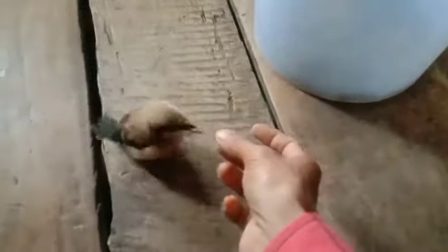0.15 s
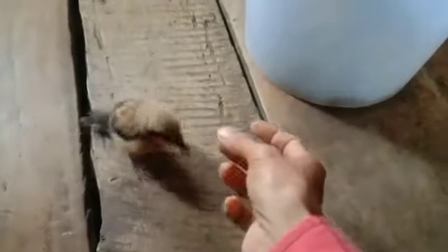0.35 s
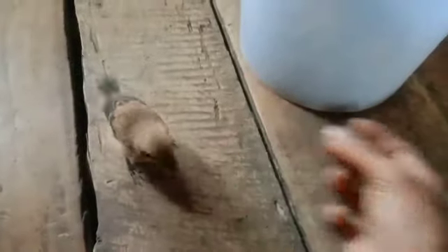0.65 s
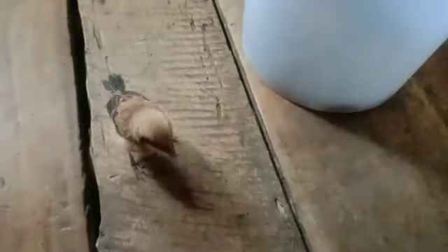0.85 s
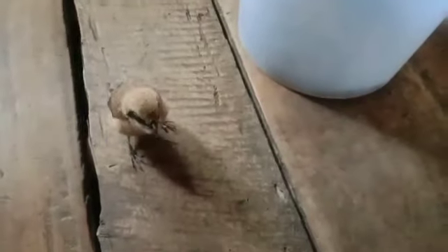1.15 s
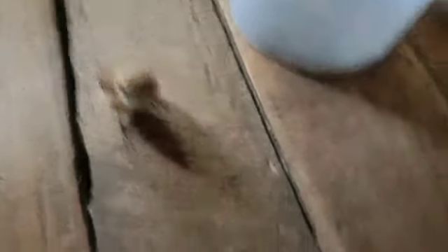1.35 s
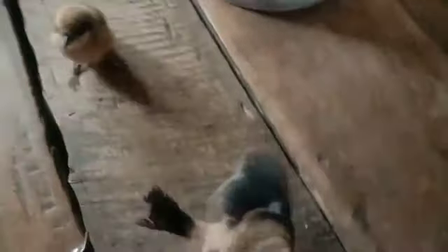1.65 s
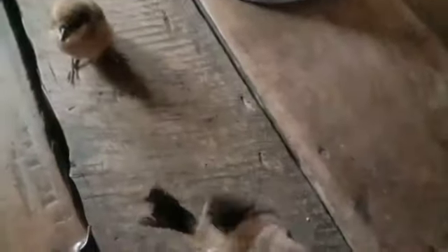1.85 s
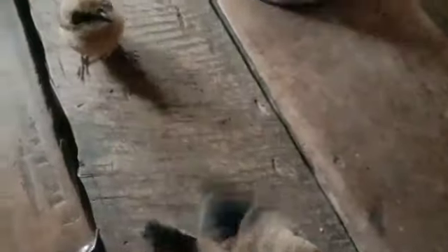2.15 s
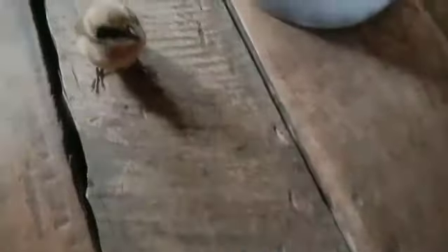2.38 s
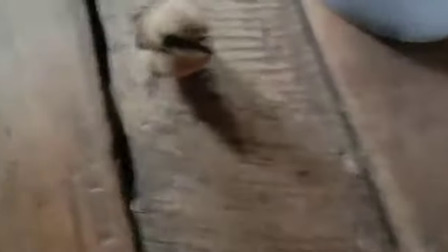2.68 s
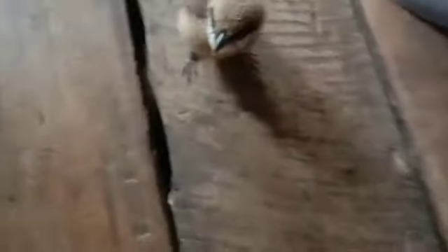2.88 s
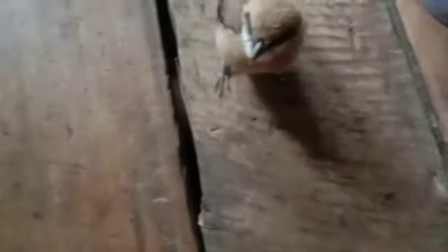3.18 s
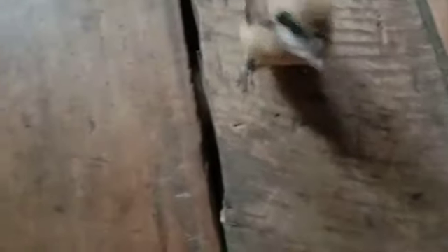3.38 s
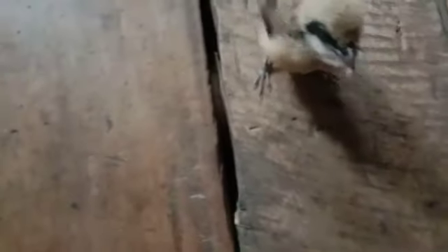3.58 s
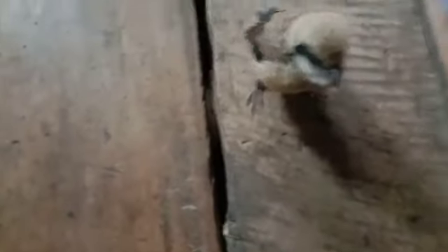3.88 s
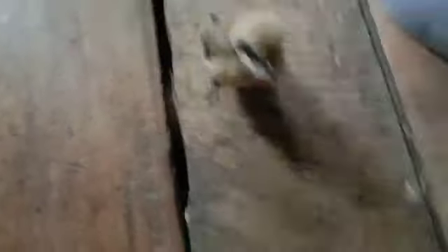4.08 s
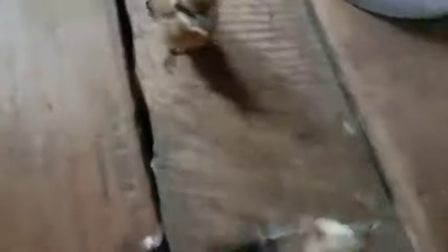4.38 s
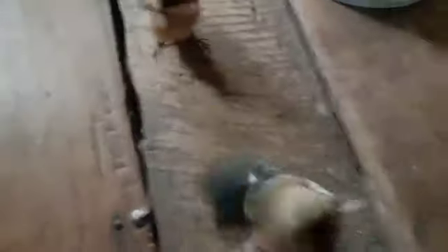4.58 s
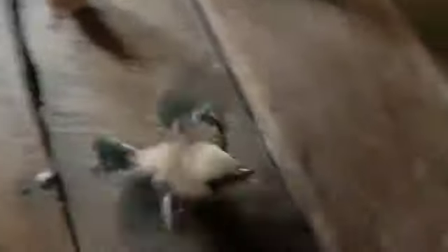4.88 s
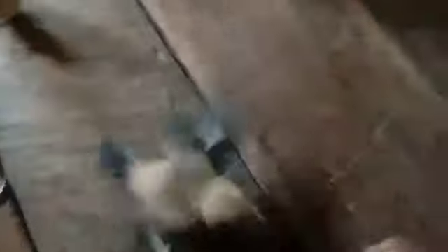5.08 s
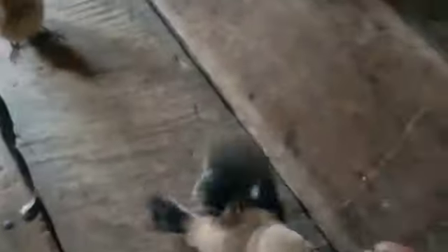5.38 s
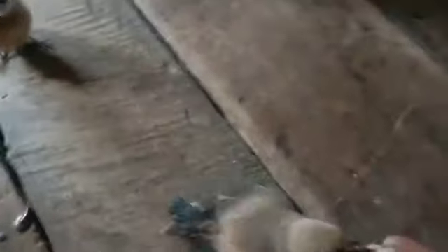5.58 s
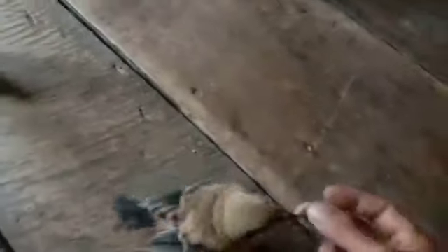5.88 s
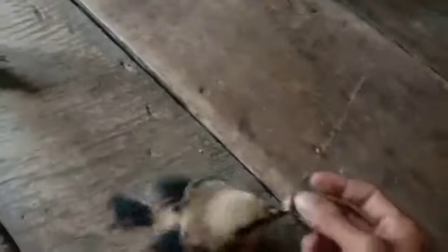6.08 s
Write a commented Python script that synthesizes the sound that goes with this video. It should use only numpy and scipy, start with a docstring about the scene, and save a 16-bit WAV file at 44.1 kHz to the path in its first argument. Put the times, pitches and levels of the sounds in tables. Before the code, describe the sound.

Two young birds beg very close to the microphone in a small wooden room with a short tail. At 0 s both are already mid-call; the lower voice then gives short, rough, nasal squawks around 0.35, 0.75, 0.9, 1.3 and 2 s, some tripping into harsh catches, most slurring downward. The higher voice adds a brief soft call near 0.9 s and raspy buzzes at 2.25 and 2.7 s. From 3.2 s both call almost continuously, overlapping, longer and more forceful, each squawk swelling; the last low one runs from 6.15 s to the end. Light woody taps dot the boards from 1.6 s, clearest near 3.9 and 5.3 s, with faint grainy scuffs at 2.5, 4.6, 5.3 and 5.8 s. Outside, a muffled slow engine rumbles, eases off around 1.5 to 2.5 s, then accelerates and approaches, its low thuds loudest at the end. Quiet air noise lies beneath.

```python
"""Rasping, overlapping squawks of two young shrikes begging close by on a plank floor; most end in a falling slur.
Each voice is a bright harmonic tone that a fast, uneven flutter of the syrinx roughens, with hissing air in it.
Outside, muffled by the walls, a slow single-cylinder engine eases off, then speeds up and comes nearer:
a thud a firing over a diffuse rumble. Small knocks ring the boards, grainy scuffs brush them, and air noise
lies beneath. The near sounds carry the short tail of a small wooden room."""
import sys
import numpy as np
from scipy import signal
from scipy.fft import rfft, irfft
from scipy.io import wavfile

SR = 44100
rng = np.random.default_rng(int(sys.argv[2]) if len(sys.argv) > 2 else 0)


def output_pcm(signal):
    """Save a mono or channel-first signal as 16-bit PCM at the path in sys.argv[1].

    Samples are clipped to [-1, 1] before scaling.
    """
    pcm = np.clip(np.atleast_2d(signal).T, -1, 1) * 32767
    wavfile.write(sys.argv[1], SR, np.round(pcm).astype(np.int16))


N = 275184
TIME = np.arange(N) / SR

# Squawks of the lower voice: scoop, held pitch, break into a second register, slur.
# (start [s], break [s], end [s], scoop time constant [s], held pitch [Hz], pitch after the break [Hz],
#  sag [Hz/s], last pitch [Hz], swell from the onset, negative dies away [dB], overtones before the break [dB],
#  overtones after [dB], fundamental against its usual share [dB], rasp before [0-1], rasp after [0-1],
#  tilt from the gape of the beak [dB/octave], mean warble rate [1/s])
SQUAWKS = [ (-.2, 0.196, .264, 0.025, 2126, 1957, 300, 1100, -19, -21.5, -20.5, 1.5, 0.43, 0.49, -6, 50),
           (0.349, 0.497, .667, 0.021, 2438, 2512, 995, 1120, 8.5, -23.5, -26, -1.5, 0.1, 0.56, -18, 40),
           (0.752, 0.814, .89, .011, 2362, 2360, 100, 2590, -14, -38.5, -43.5, 3, 0.32, 0.24, -20, 40),
           (0.888, 1.126, 1.172, .022, 1729, 1672, 402, 1380, 15.5, -22.5, -22.5, 1, .76, 0.98, 3.5, 40),
           (1.268, 1.66, 1.88, 0.025, 2087, 2153, 863, 1417, 10.5, -21, -20.5, -10, 0.7, 0.26, 8, 30),
           (1.974, 2.257, 2.383, 0.018, 2400, 2275, 610, 1266, 4.5, -26, -18.5, -5, 0.14, 0.16, 16, 30),
           (3.268, 3.504, 3.62, .023, 1862, 1895, 200, 1320, 24, -12, -19.5, -1.5, 0.5, 0.11, 6.5, 28),
           (3.715, 3.868, 4.135, 0.032, 1926, 2008, 393, 1130, 27, -12, -14, -1, 0.42, .4, 8, 28),
           (4.325, 4.677, 4.786, .023, 2072, 2228, 299, 1050, 31, -13.5, -17.5, -5.5, .6, 0.3, 9, 55),
           (4.862, 5.094, 5.436, 0.022, 2042, 2284, 891, 1130, 18.5, -18.5, -17.5, -3.5, 0.64, 0.43, 7, 50),
           (5.506, 5.715, 6.074, 0.019, 1974, 2251, 380, 1200, 23, -12, -18.5, -0.5, 0.5, 0.34, 2.5, 75),
           (6.157, 6.183, 6.6, 0.008, 2330, 2270, 617, 1220, 10.5, -26, -21, 2, 0.12, 0.29, 1, 75), ]
# Catches, where a squawk trips into a short, harsh burst: (time [s], length [s], overtone gain [dB])
CATCHES = [(0.39, 0.074, -2), (0.546, .014, 5), (1.709, 0.011, 5.5), (1.734, 0.011, 6), (1.78, .038, 3),
           (1.824, 0.013, 4.5), (2.018, 0.029, -1.5), (2.084, .034, 5), (2.154, 0.016, 6.5),
           (2.22, .025, 9), (2.327, 0.01, 1.5), (2.352, 0.018, 2.5), (5.217, 0.013, 4.5),
           (5.238, 0.012, -1.5), (5.257, 0.015, 4.5), (5.342, .035, 4)]
# The squawk's usual fundamental against its overtones, by pitch: (pitch [Hz], level [dB])
FUNDAMENTAL = [(1100, 8.5), (1280, -16), (1550, -25), (1750, -15.5), (1950, -17), (2250, -4), (2600, -6.5),
               (3000, 3.5), (3500, 12.5)]
# Buzzes of the higher voice: a soft whistle, a break into a sagging rasp, a short slur.
# (start [s], break [s], end [s], whistle's first, middle and final pitch [Hz, Hz, Hz], buzz pitch [Hz],
#  sag [Hz/s], last pitch [Hz], whistle level [dB], buzz fundamental at the break [dB],
#  buzz overtones at the break [dB], rasp [0-1], closing rasp [0-1])
BUZZES = [ (-.1, -.02, .26, 2900, 2900, 2900, 2876, 408, 1962, -22, -18, -18.5, 0.38, .9),
          (0.885, 0.94, 1.01, 3344, 2850, 2353, 2320, 100, 2160, -14.5, -26, -29, 0.2, 0.67),
          (2.24, 2.405, 2.56, 2827, 3260, 2885, 2617, 1276, 1073, -28, -18.5, -14.5, 0.6, 0.4),
          (2.68, 2.735, 2.898, 3320, 3040, 2950, 2855, 3625, 1538, -20, -18.5, -15.5, 0.62, 0.1),
          (3.163, 3.317, 3.687, 2760, 2940, 2880, 2524, 456, 1393, -32.5, -15.5, -15.5, .38, 0.14),
          (3.804, 3.875, 4.177, 2710, 2932, 2770, 2462, 493, 1588, -27, -23, -19, .5, .05),
          (4.293, 4.343, 4.665, 3150, 2950, 2700, 2518, 496, 1720, -25, -24.5, -19.5, 0.55, .9),
          (4.775, 4.864, 5.135, 3000, 2707, 2600, 2620, 1014, 1610, -20.5, -26.5, -20, 0.67, 0.45), ]
# What throat and beak do to the overtones of each voice: (frequency [Hz], gain [dB])
LOW_THROAT = [(2300, -9.5), (3100, -3.5), (4000, -0.5), (5000, 0.5), (6000, 0), (7000, -3), (7700, -27.5),
              (8400, -18), (10500, -19.5), (13300, -35.5), (15200, -23)]
HIGH_THROAT = [(3100, -5), (4000, -13.5), (5000, -2.5), (6000, -6.5), (7400, -14.5), (8400, -33),
               (10300, -30.5), (13300, -68.5), (15200, -26.5)]
# Engine speed: (time [s], firing rate [1/s])
FIRING = [(0.0, 18.5), (0.92, 18.5), (1.16, 17.7), (1.53, 15.3), (1.75, 14.6), (2.48, 14.6), (3.09, 15.2),
          (4.03, 19.2), (6.24, 24.1)]
# Engine loudness as heard indoors: (time [s], level [dB])
ENGINE_LEVEL = [(0, -62), (.4, -43.5), (1.1, -39.5), (1.3, -50), (2, -45), (3.081, -40.5), (3.2, -30),
                (3.55, -35), (4.05, -31.5), (4.6, -27.5), (5.3, -23.5), (5.6, -28), (5.9, -23.5),
                (6.24, -19.5)]
# Exhaust thuds, then diffuse rumble, as they come through the walls: (frequency [Hz], relative level [dB])
EXHAUST = [(35, -29.5), (60, -28), (100, -12), (148, 8.5), (200, -4), (280, -1.5), (340, -20), (450, -28.5),
           (800, -49.5), (4000, -87.5)]
RUMBLE = [(35, -38.5), (60, -21.5), (90, -2.5), (140, 5), (200, -5.5), (260, -6), (320, -18), (450, -31.5),
          (800, -45), (4000, -92)]
# Spectrum of the air noise: (frequency [Hz], relative level [dB])
AIR = [(20, -18.5), (200, 28), (550, -6), (1050, -0.5), (1270, 11), (1500, -7.5), (7000, -4), (9000, -30.5)]
# Taps on the boards: (time [s], relative level [dB])
KNOCKS = [(1.642, -31), (2.727, -27.5), (3.409, -32), (3.543, -25.5), (3.874, -16), (4.205, -22.5),
          (4.49, -26.5), (4.642, -43), (5.316, -18.5)]
# Ringing modes of the planks: (nominal frequency [Hz], relative level [dB], 60 dB decay time [s])
PLANK_MODES = [(300, -2.5, 0.2), (530, -24, 0.05), (734, -13, 0.038), (982, -7.5, .04), (1246, -2.5, 0.058),
               (1930, 3.5, 0.0091)]
# Scuffs on the boards: (start [s], length [s], level at mid-stroke [dB])
SCUFFS = [(2.527, 0.27, -46), (4.617, 0.087, -34.5), (5.285, 0.1, -35), (5.759, 0.57, -42)]
# Spectrum of the scuffs: (frequency [Hz], relative level [dB])
SCUFF_COLOUR = [(100, -16), (350, 3), (700, -2.5), (900, -10.5), (1300, -5.5), (3000, -16), (12000, -27.5)]
# How long the small wooden room rings: (frequency [Hz], 60 dB decay time [s])
ROOM = [(200, 0.85), (1250, 0.28), (2000, 0.2), (6000, 0.2), (12000, 0.12)]

OPEN_HZ = 3532  # pitch from which a squawk scoops down
SWELL_S, BREAK_S, SLUR_S = 0.099, 0.006, 0.038  # time constants
RASP_RISE_S, SLUR_RASP = 0.015, 0.16
SLUR_PUSH_DB = 1.5  # the bird pushes late in the slur
BROKEN_FUNDAMENTAL_DB = 2.5  # the second register is fuller
CATCH_RASP, CATCH_DROP = 0.62, 0.068  # rasp, and fraction by which the pitch drops
WHISTLE_SWELL_DB, WHISTLE_OVERTONES_DB, WHISTLE_RASP = 8.5, -8.5, 0.14
BUZZ_SWELL_DB_PER_S, BUZZ_THINNING_DB_PER_S = 21, 21  # the overtones gain as the fundamental loses
BUZZ_SLUR_S, BUZZ_CLOSING_S, BUZZ_SLUR_FADE_DB = 0.018, 0.095, 12.5
HISS_DB = -15  # air against the overtones, before the rasp scales it
IDLE_PER_S, PULLING_PER_S = 13.5, 23  # firing rates that set the ends of the load scale
EDGE_HZ = 15680  # upper band limit


def gain_of(db):
    """Decibels to amplitude."""
    return 10 ** (np.asarray(db) / 20)


def evened(x):
    """Scale to unit RMS."""
    return x / np.sqrt(np.mean(x ** 2) + 1e-20)


def blend(a, b, share):
    """Move from a to b by the given share."""
    return a + (b - a) * share


def read(points, hz):
    """Read a curve joined by straight lines on a log-frequency axis."""
    f, value = np.transpose(points)
    return np.interp(np.log(hz + 1), np.log(f + 1), value)


def add(mix, s, sound):
    """Lay a sound into the mix at s seconds."""
    part = mix[max(round(s * SR), 0):][:len(sound)]
    part += sound[:len(part)]


def wander(size, hz):
    """Smooth random drift of about unit size, weakening above hz."""
    f = np.fft.rfftfreq(SR, 1 / SR)
    spectrum = rfft(rng.standard_normal(SR)) / np.sqrt(1 + (f / hz) ** 4)
    return evened(irfft(spectrum))[:size]


def colour(x, points):
    """Causal minimum-phase filter with the given spectrum."""
    log_gain = np.log(gain_of(read(points, abs(np.fft.fftfreq(8192, 1 / SR)))))
    taps = np.fft.ifft(np.exp(np.conj(signal.hilbert(log_gain)))).real
    return signal.oaconvolve(x, taps[:len(taps) // 2])[:N]


def room(x):
    """The tail of a small wooden room: sparse reflections, each band dying at its own speed."""
    reflections = rng.choice([-1., 1.], SR // 2) * (rng.random(SR // 2) < .1)
    hz, t, bands = signal.stft(reflections, SR, nperseg=256)
    decay = gain_of(-60 * t / read(ROOM, hz)[:, None])
    tail = signal.istft(bands * decay, SR, nperseg=256)[1]
    return signal.fftconvolve(x, tail / np.linalg.norm(tail))[:N]


def squawk(start, brk, end, scoop_s, held_hz, broken_hz, sag_hz, last_hz, swell_db, before_db, after_db,
           first_db, rasp_before, rasp_after, gape_db, warble_hz):
    """Pitch, levels and rasp of one squawk: scoop, swell, break, slur, and the catches that fall within it."""
    t = np.arange(max(start, 0), end, 1 / SR)
    age = t - start
    broken = .5 + .5 * np.tanh((t - brk) / BREAK_S)
    slur = np.exp((t - end) / SLUR_S)

    hz = blend(held_hz - sag_hz * age, broken_hz - sag_hz * (t - brk), broken)
    hz = blend(hz, OPEN_HZ, np.exp(-age / scoop_s))
    hz = blend(hz, last_hz, slur)

    over_db = blend(before_db, after_db, broken) - swell_db * np.exp(-age / SWELL_S)
    over_db = over_db + SLUR_PUSH_DB * np.sin(np.pi * slur)
    fundamental_db = over_db + first_db + read(FUNDAMENTAL, hz) + BROKEN_FUNDAMENTAL_DB * broken

    # only squawks with a milder second register change their rasp in the slur
    slur_share = np.minimum(2 * slur, 1) * (rasp_after < .5)
    rasp = blend(blend(rasp_before, rasp_after, broken), SLUR_RASP, slur_share)
    rasp = rasp * (1 - np.exp(-age / RASP_RISE_S))

    for at, length, db in CATCHES:
        catch = np.exp(-np.minimum(abs(2 * (t - at) / length), 2) ** 8)
        hz = hz * (1 - CATCH_DROP * catch)
        over_db = over_db + db * catch
        rasp = blend(rasp, CATCH_RASP, catch)
    return t, hz, fundamental_db, over_db, rasp, gape_db, warble_hz


def buzz(start, brk, end, first_hz, middle_hz, final_hz, buzz_hz, sag_hz, last_hz, whistle_db, first_db,
         over_db, rasp, closing_rasp, gape_db=-5.0, warble_hz=35):
    """Pitch, levels and rasp of one buzz: whistle, break, sag, slur."""
    t = np.arange(max(start, 0), end, 1 / SR)
    since = t - brk
    broken = .5 + .5 * np.tanh(since / BREAK_S)
    slur = np.exp((t - end) / BUZZ_SLUR_S)
    along = np.minimum((t - start) / (brk - start), 1)

    whistle_hz = np.interp(along, [0, .5, 1], [first_hz, middle_hz, final_hz])
    hz = blend(blend(whistle_hz, buzz_hz - sag_hz * since, broken), last_hz, slur)

    soft_db = whistle_db - WHISTLE_SWELL_DB * (1 - along)
    slur_fade_db = BUZZ_SLUR_FADE_DB * slur
    fundamental_db = blend(soft_db, first_db - BUZZ_THINNING_DB_PER_S * since, broken) - slur_fade_db
    loud_db = over_db + BUZZ_SWELL_DB_PER_S * since
    overtones_db = blend(soft_db + WHISTLE_OVERTONES_DB, loud_db, broken) - slur_fade_db

    closing = np.exp(-((t - end) / BUZZ_CLOSING_S) ** 2)
    rasp = blend(blend(WHISTLE_RASP, rasp, broken), closing_rasp, closing)
    return t, hz, fundamental_db, overtones_db, rasp, gape_db, warble_hz


def voice(call, throat, flutter_hz, unevenness, swing, lift, throb, chaos, clear, warble, fitful, pulsing_db,
          hiss_db, brightening=0.28):
    """A clear harmonic tone gives way to a fluttering one as the rasp grows; in between it rasps in fits."""
    t, hz, first_db, over_db, rasp, gape_db, warble_hz = call
    size = len(t)

    # on the verge of rasping the voice keeps tipping over, and pitch and level scallop with it
    verge = np.exp(-((rasp - .32) / 0.2) ** 2)
    warble_rate = warble_hz * (1 + .5 * wander(size, warble_hz))
    warble_turns = np.cumsum(warble_rate) / SR + rng.random()
    fits = verge * np.tanh(2 * np.sin(2 * np.pi * warble_turns))
    rasp = np.clip(rasp * (1 + fitful * fits), 0, 1)
    hz = hz * (1 + warble * fits + (.004 + .008 * verge) * wander(size, 80))
    over_db = over_db - pulsing_db * fits

    # each flutter flicks the pitch up while it chokes the tone
    flutter_rate = flutter_hz * (1 + unevenness * wander(size, 120))
    flutter = np.cos(2 * np.pi * np.cumsum(flutter_rate) / SR)
    rough_hz = hz * (1 + rasp * (lift + swing * flutter + chaos * rasp * wander(size, 900)))
    clear_share = np.exp(-(rasp / clear) ** 2)
    choke = evened(np.exp(-throb * flutter)) * np.sqrt(1 - clear_share)
    clear_phase, rough_phase = 2 * np.pi * np.cumsum([hz, rough_hz], axis=1) / SR

    tone = np.zeros(size)
    for k in np.arange(1, 12):
        # a harder call is richer in high overtones, and the gape of the beak tilts them
        bright_db = brightening * (over_db + 20) * np.maximum(np.log2(k * hz / 5000), 0)
        tilt_db = gape_db * np.clip(np.log2(k * hz / 5400), -.5, .25)
        level_db = first_db if k == 1 else over_db + read(throat, k * hz) + bright_db + tilt_db
        partial = np.sqrt(clear_share) * np.sin(k * clear_phase) + choke * np.sin(k * rough_phase)
        below_nyquist = k * rough_hz < SR / 2
        tone += gain_of(level_db + 1.6 * wander(size, 60)) * partial * below_nyquist

    # air rushing through the same throat
    f = np.fft.rfftfreq(SR, 1 / SR)
    hiss_gain = gain_of(read(throat, f)) * f * (f > 1800)
    hiss = evened(irfft(rfft(rng.standard_normal(SR)) * hiss_gain))[:size]
    breath = gain_of(over_db + hiss_db) * rasp * hiss

    edges = np.clip(np.minimum((t - t[0]) / .004, (t[-1] - t) / .008), 0, 1)  # short fades [s]
    return t[0], np.sqrt(2) * (tone + breath) * edges


def birds():
    """Two syrinxes close by: the lower voice squawks, the higher one buzzes."""
    out = np.zeros(N)
    # pulsing: the low voice's overtones are loudest in its clear moments, the high voice's in its rasping ones
    for row in SQUAWKS:
        add(out, *voice(squawk(*row), LOW_THROAT, flutter_hz=269.7, unevenness=0.17, swing=0.069, lift=0.11,
                        throb=0.16, chaos=0.11, clear=0.63, warble=0.013, fitful=0.73, pulsing_db=1.5,
                        hiss_db=HISS_DB))
    for row in BUZZES:
        add(out, *voice(buzz(*row), HIGH_THROAT, flutter_hz=200, unevenness=0.078, swing=0.16, lift=0.1,
                        throb=0.55, chaos=0.056, clear=0.56, warble=0.0056, fitful=0.22, pulsing_db=-2.5,
                        hiss_db=HISS_DB))
    return out


def engine():
    """One exhaust thud a firing; as the engine slows and loses load, the thuds sink into a diffuse rumble."""
    rate = np.interp(TIME, *np.transpose(FIRING))
    level_db = np.interp(TIME, *np.transpose(ENGINE_LEVEL))
    load = np.clip((rate - IDLE_PER_S) / (PULLING_PER_S - IDLE_PER_S), 0, .85)
    firings = np.diff(np.floor(np.cumsum(rate) / SR), prepend=0)
    thuds = colour(firings, EXHAUST)
    thuds = evened(thuds + gain_of(-9) * room(thuds))
    rumble = evened(colour(rng.standard_normal(N), RUMBLE))
    rumble_share = 1 - load
    thud_share = np.sqrt(1 - rumble_share ** 2)  # the two powers sum to one
    return gain_of(level_db) * (thud_share * thuds + rumble_share * rumble)


def air():
    """Steady air noise: random pressure with a fixed spectrum."""
    return gain_of(-48.5) * evened(colour(rng.standard_normal(N), AIR))


def knocks(knock_db=-7):
    """Taps ring the planks briefly, as decaying modes that shift a little from tap to tap."""
    out = np.zeros(N)
    t = np.arange(SR // 5) / SR
    for s, tap_db in KNOCKS:
        ring = np.zeros(len(t))
        for hz, db, t60 in PLANK_MODES:
            mode_hz = hz * rng.uniform(.93, 1.07)
            ring += gain_of(db - 60 * t / t60) * np.sin(2 * np.pi * mode_hz * t)
        add(out, s, gain_of(tap_db + knock_db) * ring)
    return out


def scuffs(grain_db=1.5, grains_per_s=2500):
    """Strokes across the boards: fine random grains that swell and fade."""
    sizes = gain_of(grain_db * rng.exponential(1, N))
    grains = rng.standard_normal(N) * sizes * (rng.random(N) < grains_per_s / SR)
    stroke = np.zeros(N)
    for s, length, db in SCUFFS:
        across = 2 * (TIME - s) / length - 1  # -1 to 1 over the stroke
        stroke += gain_of(db) * np.sqrt(np.clip(1 - across ** 2, 0, 1))
    return stroke * evened(colour(grains, SCUFF_COLOUR))


def scene():
    """Birds and boards close by in the room, the engine beyond the walls, air beneath; one channel."""
    near = birds() + knocks() + scuffs()
    return (near + gain_of(-11.5) * room(near) + engine() + air())[None]


def record(dry):
    """The microphone signal: peaks beyond full scale clip, then a low-pass limits the band."""
    clipped = np.clip(dry, -1, 1)
    low_pass = signal.firwin(511, EDGE_HZ, window=("kaiser", 9), fs=SR)
    return signal.oaconvolve(clipped, low_pass[None], "same")


dry = scene()
out = record(dry)
output_pcm(out)
```